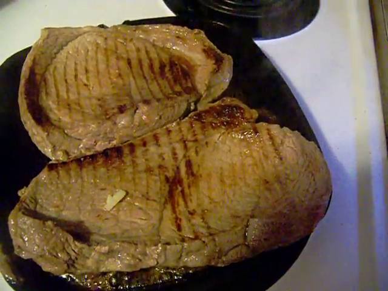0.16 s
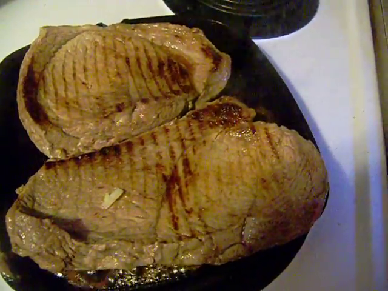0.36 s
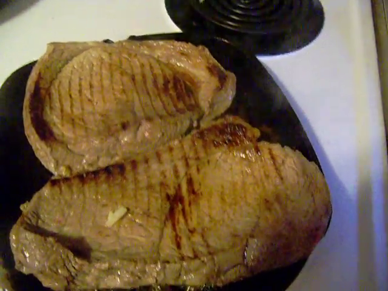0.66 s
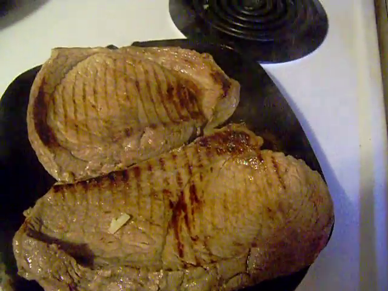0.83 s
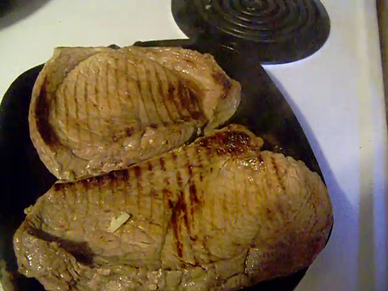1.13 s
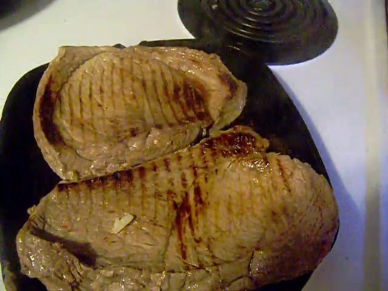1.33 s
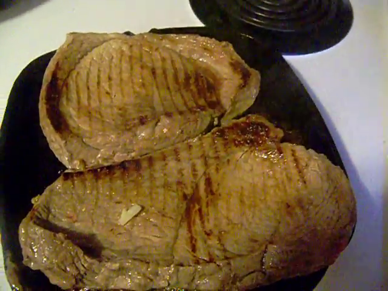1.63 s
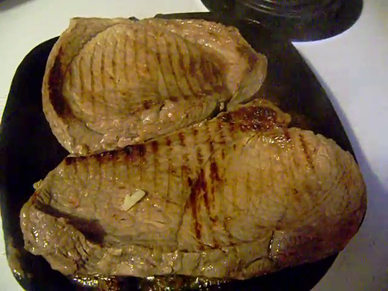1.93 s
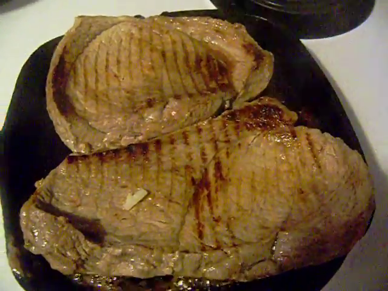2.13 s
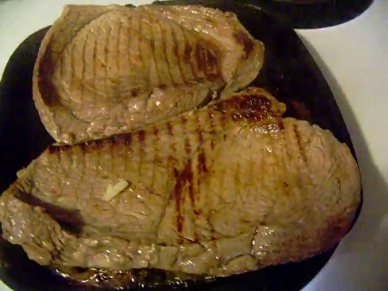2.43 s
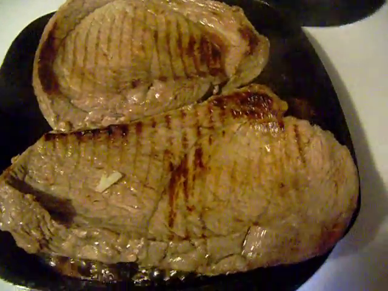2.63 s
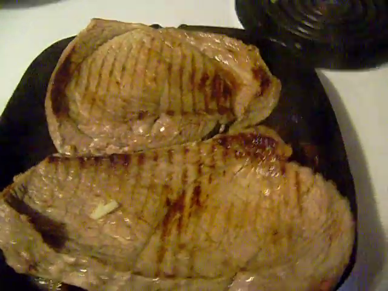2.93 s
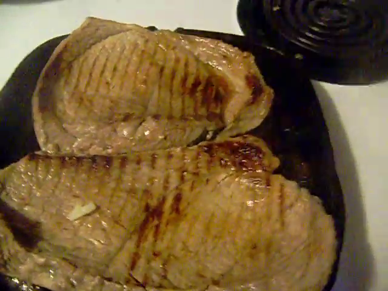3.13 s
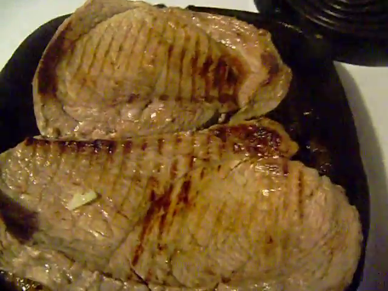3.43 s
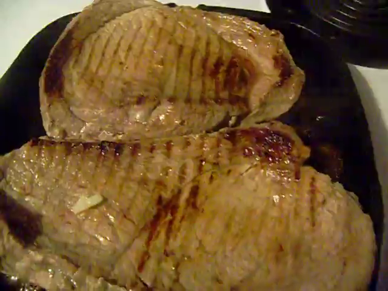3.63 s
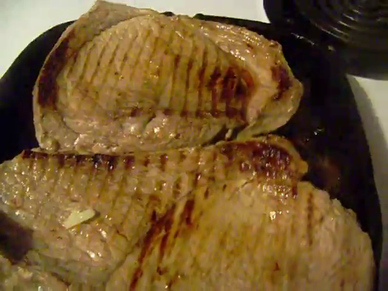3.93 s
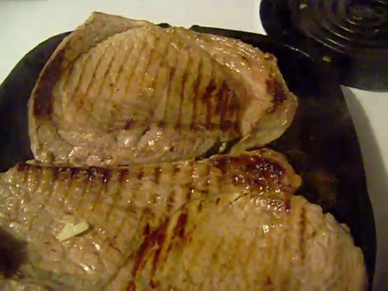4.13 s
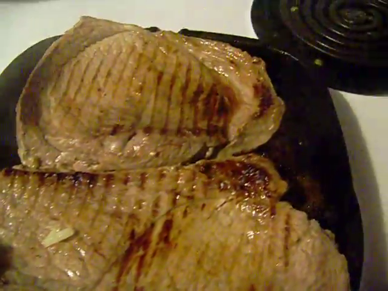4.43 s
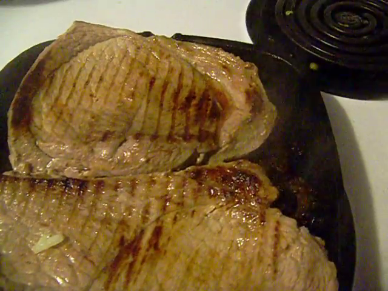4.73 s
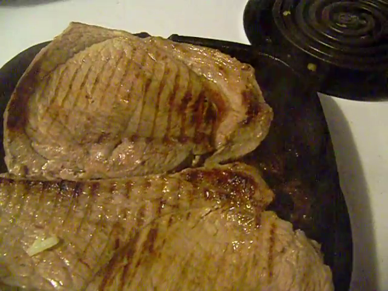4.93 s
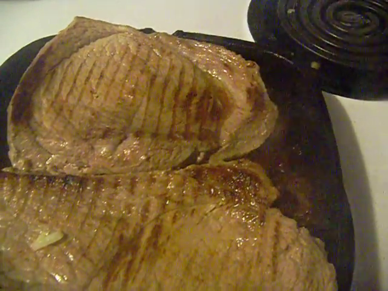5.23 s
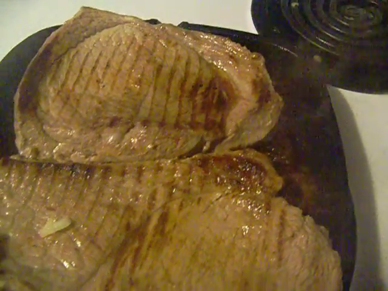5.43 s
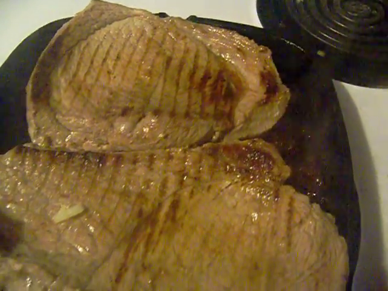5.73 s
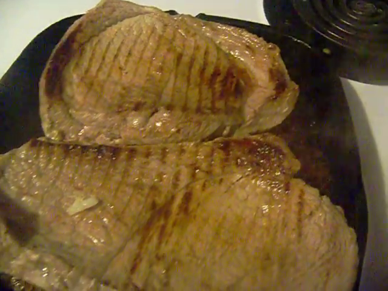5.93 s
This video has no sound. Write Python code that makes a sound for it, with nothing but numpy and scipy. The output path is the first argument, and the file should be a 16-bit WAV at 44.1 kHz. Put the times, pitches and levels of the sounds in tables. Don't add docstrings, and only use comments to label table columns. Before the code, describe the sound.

A close, slightly dull hand-held pickup of frying meat in a small hard-walled kitchen. Constant dense sizzle carries irregular crackles and pops. A bright metal clink with a few tight bounces comes early, after which the fizz is briefly quieter and duller. It swells again as the microphone nears the pan, ending with a cluster of hard, loud snaps. Soft handling thumps and low rumble lie underneath.

```python
import sys
import numpy as np
from scipy import signal
from scipy.fft import rfft, irfft
from scipy.io import wavfile

SR = 44100
rng = np.random.default_rng(int(sys.argv[2]) if len(sys.argv) > 2 else 0)


def store_pcm(level_fs):
    pcm = np.round(np.clip(level_fs, -1, 1) * 32767).astype(np.int16)
    wavfile.write(sys.argv[1], SR, np.atleast_2d(pcm).T)


def gain_from_db(level_db):
    decades = np.asarray(level_db, float) / 20
    return 10 ** decades


N = 267687


def in_time(rows):
    time_s, *columns = np.transpose(rows)
    return [np.interp(np.arange(N) / SR, time_s, column) for column in columns]


def at_hz(points, hz):
    points_hz, points_db = np.transpose(points)
    return np.interp(np.log(hz), np.log(points_hz), points_db)


def rms_one(x):
    return x / np.sqrt(np.mean(x ** 2) + 1e-20)


def drift(rate_hz):
    r = np.exp(-40 * np.pi * rate_hz / SR)
    noise = rng.standard_normal(N // 20 + 2002)
    slow = signal.lfilter([1], [1, -2 * r, r * r], noise)[2000:]
    return np.interp(np.arange(N) / 20, np.arange(len(slow)), rms_one(slow))


def ring(clicks, hz, t60_s):
    r = gain_from_db(-60 / (t60_s * SR))
    w = 2 * np.pi * hz / SR
    return signal.lfilter([0, np.sin(w)], [1, -2 * r * np.cos(w), r * r], clicks + 1e-18)


def add(out, start_s, piece):
    i = round(start_s * SR)
    out[i:i + len(piece)] += piece[:N - i]


def coloured(spectrum):
    hz = np.maximum(np.arange(N // 2 + 1) * SR / N, 1)
    noise = rfft(rng.standard_normal(N))
    return rms_one(irfft(noise * gain_from_db(at_hz(spectrum, hz)), N))


# (frequency [Hz], density [dB per Hz])
RUMBLE_SPECTRUM = [(12, -20.5), (20, 10.5), (69, 9.5), (393, -8.5), (484, -56.5), (549, -32.5), (614, 3.5),
                   (755, -40), (900, -9.5), (1170, -25.5), (1980, -120)]
# (time [s], peak [dB], pitch [Hz])
THUMPS = [
    (0.290, -42, 500),
    (0.293, -40, 950),
    (0.82, -42, 1200),
    (1.533, -43, 160),
    (2.190, -48, 230),
    (2.2, -47, 900),
    (2.922, -41, 110),
    (2.952, -38, 350),
]


def rumble():
    mean_db, follow_share = -58, 0.54
    sizzle_db = in_time(FRY)[0]
    swing_db = follow_share * (sizzle_db - sizzle_db.mean())
    level = gain_from_db(mean_db + swing_db + .8 * drift(14))
    out = level * coloured(RUMBLE_SPECTRUM)
    t = np.arange(2000) / SR
    for time_s, peak_db, hz in THUMPS:
        add(out, time_s, gain_from_db(peak_db) * np.sin(2 * np.pi * hz * t) * gain_from_db(-60 * t * hz / 8))
    return out


def kitchen(x):
    t60_s = 0.28
    t = np.arange(SR // 2) / SR
    tail = rng.standard_normal(len(t)) * gain_from_db(-60 * t / t60_s) * (t > .003)
    return signal.fftconvolve(x, tail / np.sqrt(np.sum(tail ** 2)))[:N]


# (time [s], strength [dB], brightness [dB per octave], clack re modes [dB], onset [s])
TOUCHES = [
    (1.5086, -27, 3.5, 8.5, 0.0046),
    (1.5313, -19, .3, 6, 0.00018),
    (1.542, -24.5, -3.5, 3, 0.0017),
    (1.556, -21, -0.5, 1.5, 0.0013),
    (1.580, -24, -3, 2, 0.0022),
    (1.607, -24, -4, -2, 0.0018),
]
STEEL_HZ = [2148, 2848, 3499, 4468, 4891, 4920, 5685, 5777, 5822, 6021, 6219, 6292, 6359, 6582, 6881, 7027,
            7096, 7141, 7185, 7305, 7727, 8272]
# (level [dB], t60 [s])
STEEL_MODES = [(-32, 0.13), (-20, 0.13), (-19, 0.16), (-12.5, 0.12), (-4, 0.11), (-2.5, 0.17), (-7, 0.53),
               (-10, .4), (-11, 0.28), (-14, .2), (-5, .25), (-5.5, 0.25), (-6, 0.2), (-10, 0.33),
               (-16, .15), (-2.5, 0.15), (-3, 0.22), (-8, .2), (-10, 0.22), (-10, .2), (5, 0.11), (2, 0.11)]


def utensil():
    rest_s, rest_share = 1.595, 0.44
    rattle_db, rattle_hz = 1.2, 500
    out, t = np.zeros(N), np.arange(9000) / SR
    next_touches_s = [row[0] for row in TOUCHES[1:]] + [N / SR]
    shape = (len(TOUCHES), len(STEEL_MODES))
    luck, turns = rng.standard_normal(shape), rng.random(shape)
    turns = turns[0] + .3 * turns
    clack_band = signal.butter(1, [1400, 8000], "band", fs=SR, output="sos")
    for touch, next_s, chance, turn in zip(TOUCHES, next_touches_s, luck, turns):
        time_s, strength_db, bright_db, clack_db, onset_s = touch
        age_s = t + np.maximum(time_s + t - rest_s, 0) / rest_share
        modes = np.zeros(len(t))
        for hz, (db, t60_s), c, p in zip(STEEL_HZ, STEEL_MODES, chance, turn):
            mode_db = db + bright_db * 2.5 * np.log2(hz / 6000) + 0.98 * c
            modes += gain_from_db(mode_db - 60 * age_s / t60_s) * np.sin(2 * np.pi * (hz * (time_s + t) + p))
        clack = signal.sosfilt(clack_band, rng.standard_normal(len(t)))
        clack *= gain_from_db(clack_db - 60 * age_s / 0.28)
        onset = np.minimum(t / onset_s, 1)
        choke = gain_from_db(-7 * np.clip((t - (next_s - time_s)) / 0.0018, 0, 1))
        add(out, time_s, gain_from_db(strength_db - 8) * onset * choke * (modes + clack))
    return out * gain_from_db(rattle_db * drift(rattle_hz))


def crackles():
    count, over_db, spread_db = 260, 14, 3
    centre_hz, spread_octaves, width_hz = 3600, .4, 800
    time_s = rng.uniform(.01, N / SR - .04, count)
    luck = rng.standard_normal((count, 2))
    sizzle_db = in_time(FRY)[0][(time_s * SR).astype(int)]
    peak_db = sizzle_db + over_db + spread_db * np.minimum(luck[:, 0], 1)
    hz = centre_hz * 2 ** (spread_octaves * np.clip(luck[:, 1], -2, 2))
    return [(*row, width_hz) for row in zip(time_s, peak_db, hz)]


# (time [s], peak [dB], pitch [Hz], width [Hz])
BIG_POPS = [(0.1098, -20, 2990, 770), (0.1392, -22, 4130, 680), (0.1403, -21.5, 2630, 700),
            (0.319, -18, 3610, 750), (0.326, -21.5, 3570, 820), (0.367, -20.5, 3720, 650),
            (1.177, -14, 3490, 460), (1.256, -24, 4120, 1070), (1.741, -21.5, 2980, 710),
            (1.9726, -18.5, 3840, 500), (2.624, -20, 3800, 1210), (2.8572, -18, 3500, 1000),
            (2.97, -22.5, 2760, 940), (3.0088, -18, 3460, 1800), (3.1933, -20, 2230, 950),
            (3.2811, -21.5, 2860, 990), (3.4793, -20, 3760, 920), (3.654, -21.5, 3520, 890),
            (3.801, -20.5, 3050, 650), (3.964, -20, 1870, 1000), (4.5275, -22, 4450, 1620),
            (4.8763, -17.5, 3440, 640), (5.1758, -11.5, 3800, 1050), (5.191, -15, 2390, 940),
            (5.2396, -14, 3200, 1190), (5.3637, -16, 4050, 550), (5.4874, -15, 4100, 600),
            (5.5749, -12, 4220, 1020), (5.5959, -14, 3670, 606), (6.007, -22, 3510, 960)]
# (time [s], peak [dB], pitch [Hz])
SMALL_POPS = [(0.0715, -29, 3410), (0.2022, -23.5, 3640), (0.3962, -21.5, 4200), (0.407, -25, 4400),
              (0.4917, -25, 4110), (0.5987, -31, 3700), (0.7162, -26, 3530), (0.8218, -23, 2900),
              (0.8936, -24, 3990), (1.175, -29, 3550), (1.1999, -23.5, 3320), (1.355, -21.5, 3680),
              (1.685, -24.5, 3300), (1.914, -25, 3430), (1.9358, -29, 3970), (1.948, -27, 3920),
              (2.3256, -26, 2870), (3.1494, -29, 3600), (3.433, -22, 3900), (3.586, -23, 3640),
              (3.7114, -25, 2900), (3.831, -20.5, 4230), (4.1654, -19.5, 3850), (4.4251, -21.5, 2280),
              (4.7416, -20, 2680), (5.0133, -22.5, 3130), (5.1232, -18.5, 3440), (5.1801, -17, 3500),
              (5.228, -18, 3600), (5.9028, -19.5, 4050)]


def pops():
    small_width_hz = 650
    mean_spit_db, spit_spread_db = -11.5, 3.0
    t, out = (np.arange(1400) - 60) / SR, np.zeros(N)
    small = [(*row, small_width_hz) for row in SMALL_POPS]
    for time_s, peak_db, hz, width_hz in BIG_POPS + small + crackles():
        spit_db = mean_spit_db + spit_spread_db * rng.standard_normal()
        rise, fall = np.exp(-(t * width_hz * 6.0) ** 2), np.exp(-t * width_hz * 3.5)
        snap = -np.cos(2 * np.pi * hz * t) * np.where(t < 0, rise, fall)
        snap -= gain_from_db(-10.5) * (1 - 2 * (t * 6500) ** 2) * np.exp(-(t * 6500) ** 2)
        gusts_db = 2.4 * rng.standard_normal(len(t) // 50).repeat(50)
        grit = rng.standard_normal(len(t)) * gain_from_db(gusts_db)
        spit = rms_one(ring(grit, 1.096 * hz, 22.0 / hz))
        spit = spit * gain_from_db(spit_db - 60 * t / 0.032) * np.clip(t / 0.0015, 0, 1)
        add(out, time_s + t[0], gain_from_db(peak_db - 6.5) * (snap + spit))
    return out


# (time [s], sizzle level [dB], microphone nearness [0-1])
FRY = [(0.0, -45, 0.2), (0.12, -44.5, .1), (0.54, -45.5, .1), (0.95, -46.5, .2), (1.49, -45.5, .05),
       (1.66, -47.5, .05), (1.8, -49, .1), (2.4, -49.5, 0.3), (2.57, -45.5, 0.5), (2.83, -42.5, .5),
       (3.24, -45, 1), (3.63, -42.5, 0.5), (3.94, -44, .9), (4.36, -40.5, 1), (5.05, -39, .9),
       (5.42, -39.5, 0.7), (5.63, -40.5, 0.6), (6.07, -41.5, 0.6)]
# (frequency [Hz], density [dB per Hz])
FIZZ_SPECTRUM = [(180, -40), (300, -34.5), (545, -37), (625, -11.5), (766, -30), (991, -8.5), (1800, -3.5),
                 (1980, -3.5), (2670, -0.5), (3650, 1.5), (5260, -6), (7190, -5.5), (7700, -6),
                 (10000, -35.5), (16900, -120)]


def sizzle(mist_db, per_s, spread_db, cycles, patchy_db, surge_db):
    level_db, nearness = in_time(FRY)
    closer = nearness - nearness.mean()
    body_db, top_db, edge_db = 4.5 * closer, -2 * closer, -9.5 * closer
    top_db = top_db - 3.0 * (np.searchsorted((1.63, 2.4), np.arange(N) / SR) == 1)
    sizes = gain_from_db(spread_db * np.minimum(rng.exponential(1, N), 4.5)) * rng.choice([-1, 1], N)
    bursts = sizes * (rng.random(N) < per_s / SR)
    bursts = bursts + gain_from_db(mist_db) * rng.standard_normal(N)
    dealt = rng.integers(0, 24, N)
    surge, patches = drift(36), [drift(17.8) for _ in range(9)]
    out = np.zeros(N)
    for k, hz in enumerate(np.geomspace(350, 8600, 24)):
        shade_db = np.clip(np.log2(2600 / hz), 0, 1) * body_db
        shade_db = shade_db + (hz > 5150) * top_db + (3900 < hz < 5150) * edge_db
        blend = np.pi / 6 * (k % 3)
        patch = np.cos(blend) * patches[k // 3] + np.sin(blend) * patches[k // 3 + 1]
        gain = gain_from_db(shade_db + patchy_db * patch + surge_db * surge)
        rings = ring(bursts * (dealt == k) * gain, hz, cycles / hz)
        out += rings * hz * gain_from_db(at_hz(FIZZ_SPECTRUM, hz))
    return gain_from_db(level_db) * rms_one(out)


def scene():
    fizz = sizzle(mist_db=-3.5, per_s=4000, spread_db=3.0, cycles=13.2, patchy_db=1.0, surge_db=0.26)
    pan = gain_from_db(-0.72) * fizz + pops()
    clink = utensil()
    echo = kitchen(gain_from_db(-12) * pan + gain_from_db(-12) * clink)
    return (pan + clink + echo + rumble())[None]


def top_cut(x):
    return signal.sosfilt(signal.butter(12, 9140, fs=SR, output="sos"), x)


# (frequency [Hz], gain [dB])
MIC_EDGE = [(7450, 1), (7750, -6.5), (8000, -7.5), (8900, -17), (9120, -35.5), (9250, -77), (9600, -120)]


def record(dry):
    hz = np.maximum(np.arange(N + 1) * SR / (2 * N), 1)
    dull = irfft(rfft(dry, 2 * N) * gain_from_db(at_hz(MIC_EDGE, hz)), 2 * N)[:, :N]
    return top_cut(dull)


dry = scene()
out = record(dry)
store_pcm(out)
```